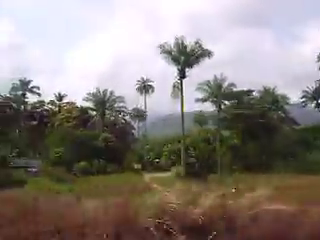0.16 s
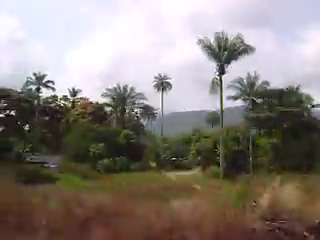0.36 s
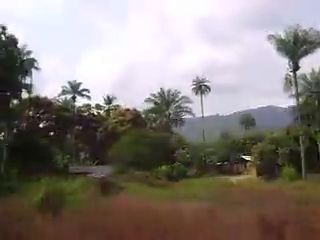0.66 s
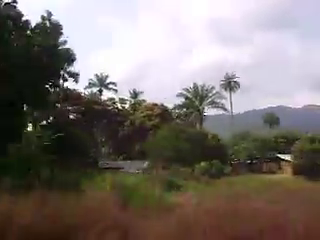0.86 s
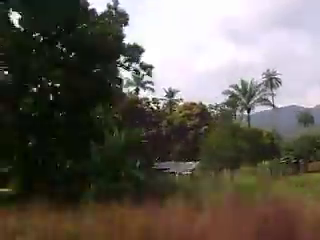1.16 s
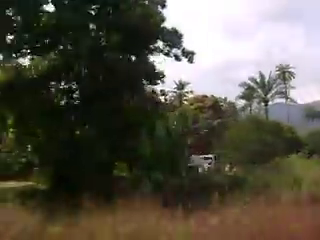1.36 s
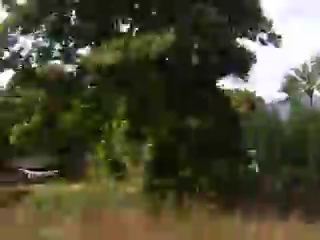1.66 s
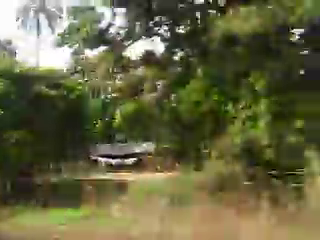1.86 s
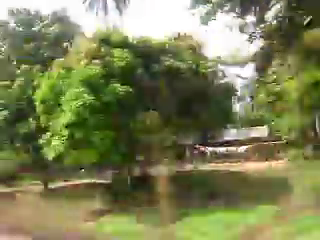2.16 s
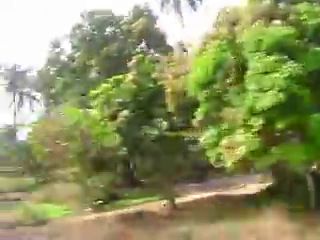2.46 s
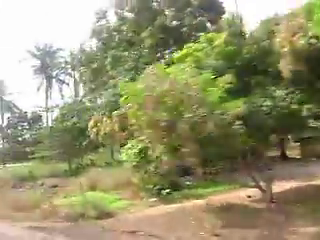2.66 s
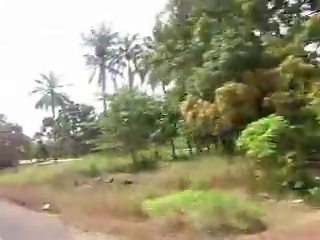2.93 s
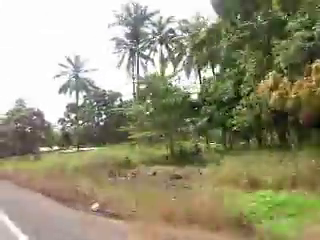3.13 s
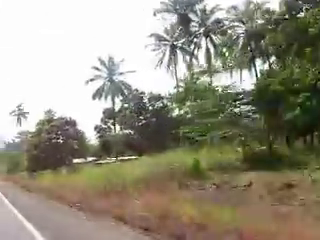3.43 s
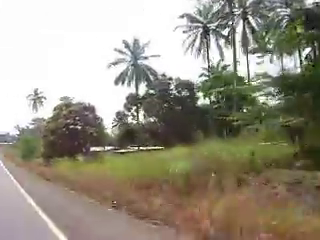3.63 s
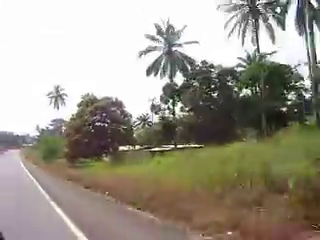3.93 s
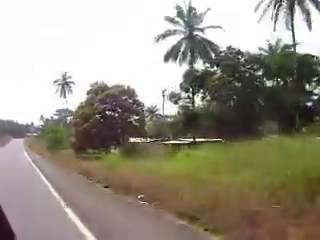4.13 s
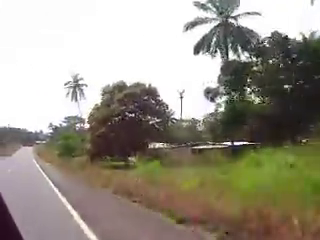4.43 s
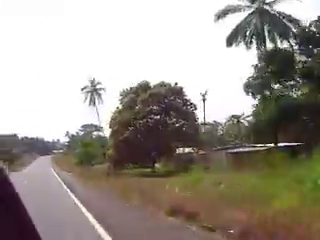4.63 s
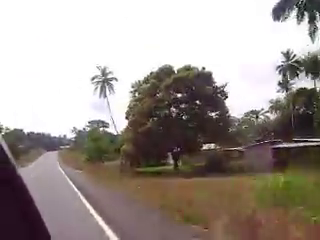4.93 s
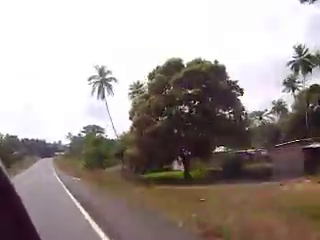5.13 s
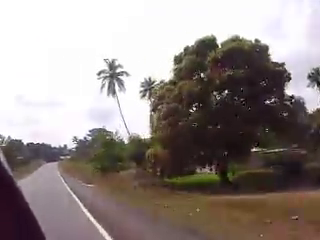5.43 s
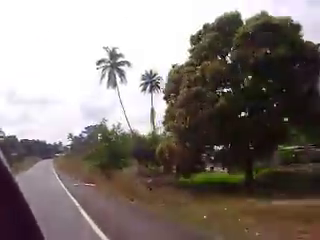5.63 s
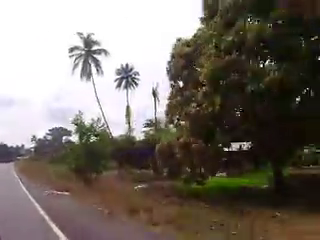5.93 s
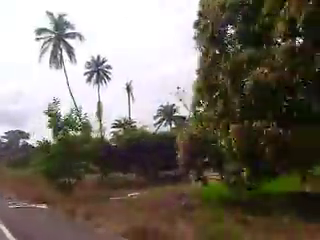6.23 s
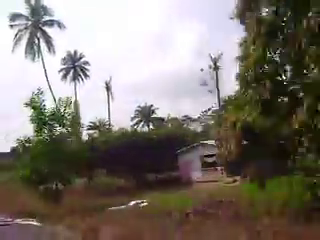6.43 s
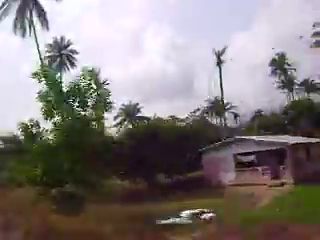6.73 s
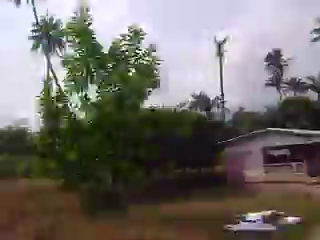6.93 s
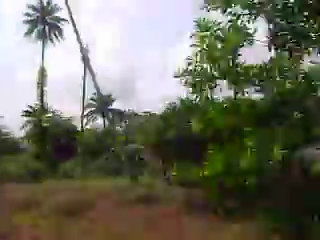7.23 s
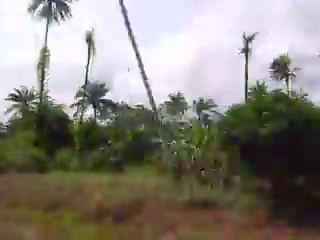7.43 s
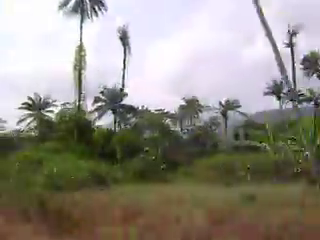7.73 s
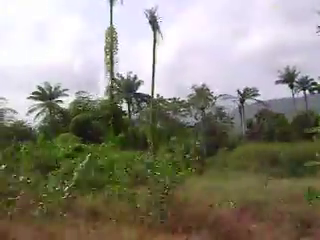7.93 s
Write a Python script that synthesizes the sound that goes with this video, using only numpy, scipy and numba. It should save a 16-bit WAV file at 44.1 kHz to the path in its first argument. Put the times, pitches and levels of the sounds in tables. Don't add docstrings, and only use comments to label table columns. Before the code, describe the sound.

Inside a moving car, steady road noise is overwhelmed by pumping, crackling wind distortion that thins out and drops off sharply.

```python
import sys
import numpy as np
from scipy import signal
from scipy.fft import rfft, irfft
from scipy.io import wavfile
from scipy.ndimage import uniform_filter1d
from numba import njit

SR = 44100
rng = np.random.default_rng(int(sys.argv[2]) if len(sys.argv) > 2 else 0)


def log_audio(samples):
    frames = np.atleast_2d(samples).T
    limited = np.clip(frames, -1, 1)
    pcm = np.round(limited * 32767).astype(np.int16)
    wavfile.write(sys.argv[1], SR, pcm)


def nominal_scale(level):
    x = np.asarray(level, float) / 20
    return 10 ** x


N = 356328
TIME_S = np.arange(N) / SR


def curve(table):
    s, *columns = np.transpose(table)
    return [np.interp(TIME_S, s, column) for column in columns]


def bumps(table):
    s, length_s, *columns = np.transpose(table)
    coarse_s = np.arange(0, N, 32) / SR
    distance = (coarse_s - s[:, None]) / np.maximum(length_s, .01)[:, None]
    bell = np.exp(-(2 * distance) ** 2)
    return [np.interp(TIME_S, coarse_s, column @ bell) for column in columns]


def unit(x):
    return x / np.sqrt(np.mean(x ** 2))


def even(x, seconds):
    return x / np.sqrt(uniform_filter1d(x ** 2, int(seconds * SR)) + 1e-12)


def walk(rate_hz):
    hold = int(SR / rate_hz)
    steps = np.repeat(rng.standard_normal(N // 100), hold)[:N]
    return unit(uniform_filter1d(uniform_filter1d(steps, hold), hold))


def coloured(spectrum):
    hz, db = np.transpose(spectrum)
    f = np.maximum(np.fft.rfftfreq(N, 1 / SR), 1)
    gain = nominal_scale(np.interp(np.log(f), np.log(hz), db))
    gain = gain * np.minimum(f / hz[0], 1) ** 3
    return unit(irfft(rfft(rng.standard_normal(N)) * gain, N))


def split(x, hz):
    low = signal.sosfiltfilt(signal.butter(2, hz, fs=SR, output="sos"), x)
    return low, x - low


@njit
def resonance(x, hz, damping):
    y, band, low = np.empty(len(x)), 0., 0.
    for i in range(len(x)):
        g = np.tan(np.pi * hz[i] / SR)
        v = (band + g * (x[i] - low)) / (1 + g * (g + damping))
        band = 2 * v - band
        low = low + 2 * g * v
        y[i] = damping * v
    return y


# start_s, level_db
ROAD_GAIN = [
    (0, 0),
    (.5, -1.5),
    (1.9, -2),
    (2.4, 1),
    (4, -7.5),
    (6.5, -18),
    (8.08, -20.5),
]
# pitch_hz, level_db (per Hz)
TYRE_TONE = [
    (60, 5),
    (150, -17.5),
    (400, -12),
    (900, -6),
    (1300, -10.5),
    (1900, -13.5),
    (2800, -21),
    (4000, -31.5),
    (5500, -38.5),
]
# pitch_hz, level_db
GEAR_TONES = [
    (366.1, -40),
    (678.3, -39.5),
    (931.3, -37),
]


def road():
    roar_db = -23.5 + 0.15 * walk(8.9) + 1.2 * walk(40)
    sound = coloured(TYRE_TONE) * nominal_scale(roar_db)
    for hz, db in GEAR_TONES:
        level = nominal_scale(db + 4.0 + 0.73 * walk(4.5))
        wavering_hz = hz * (1 + .003 * walk(5))
        sound = sound + level * np.sin(2 * np.pi * np.cumsum(wavering_hz) / SR)
    return sound * nominal_scale(curve(ROAD_GAIN)[0])


# start_s, level_db
BUFFET_LEVEL = [(0, -20), (.4, -20), (.75, -27), (1.1, -32), (1.5, -19.5), (2.0, -20), (2.1, -11),
                (2.7, -7), (3.5, -9), (3.85, -13.5), (4.05, -9), (4.3, -13), (4.55, -10.5), (4.9, -14),
                (5.3, -10.5), (5.9, -16.5), (7.4, -16), (7.55, -23)]
# start_s, pitch_hz
BUFFET_PITCH = [
    (0, 60.3),
    (1.3, 60),
    (1.6, 74.7),
    (2.4, 81),
    (3, 95.96),
    (5.5, 100.8),
    (6.5, 87.2),
    (7.3, 70.43),
    (8.08, 57.9),
]
# middle_s, length_s, level_db
THROB_EVENTS = [(.27, 0.087, -11), (.38, .04, -8), (.79, .05, -7), (.84, .06, 5.5), (.94, 0.046, -8.5),
                (1.0, 0.067, 3.5), (1.58, 0.12, -8), (1.75, .08, 4.5), (1.93, 0.072, -3),
                (2.63, 0.049, -11.5), (2.86, 0.13, -4), (3.17, .07, -16), (3.26, 0.056, -9.5),
                (3.31, .05, 4), (3.37, 0.032, -3.5), (3.6, 0.05, -4.5), (3.9, 0.034, 5.5),
                (3.94, .05, -6.5), (4.34, 0.038, -11), (4.395, .06, 6), (4.54, 0.066, 7),
                (4.97, 0.055, -0.5), (5.22, .06, -3.5), (5.6, .1, -7), (5.69, .08, 4.5), (5.99, .06, -6),
                (6.05, .06, 9.5), (6.12, .06, -3), (6.8, 0.11, 5), (7.84, 0.069, -6.5)]


def buffet():
    level_db = curve(BUFFET_LEVEL)[0] + bumps(THROB_EVENTS)[0] + 1.5 * walk(14)
    hz = curve(BUFFET_PITCH)[0]
    ring = resonance(resonance(rng.standard_normal(N), hz, 0.8), hz, 0.8)
    deep = resonance(resonance(rng.standard_normal(N), .5 * hz, 1.1), .5 * hz, 1.1)
    deep_db = -4 - 0.12 * (hz - 60)
    return (even(ring, .12) + nominal_scale(deep_db) * even(deep, 0.098)) * nominal_scale(level_db - 0.28)


def crackle(rate_hz, spread_db, seconds):
    when, size = rng.random((2, 4000))
    used = int(rate_hz * N / SR)
    hits = np.zeros(N)
    hits[(when[:used] * N).astype(int)] = nominal_scale(-spread_db * np.log(1 - size[:used]))
    return unit(1 + signal.fftconvolve(hits, np.hanning(int(seconds * SR)), "same"))


def without(heard_db, road_db):
    heard_power = nominal_scale(2 * heard_db)
    road_power = nominal_scale(2 * (road_db + curve(ROAD_GAIN)[0]))
    return np.sqrt(np.maximum(heard_power - road_power, 0.042 * heard_power))


# pitch_hz, level_db (per Hz)
EDDY_TONE = [
    (130, 3.5),
    (243, -4.5),
    (594, -16),
    (1130, -26),
    (1870, -29),
    (2410, -32.5),
    (4480, -26),
    (5600, -21),
]
# start_s, level_db (force), fine_db (fine eddies against large ones)
STREAM_FORCE = [(0, -23.5, -15.5), (.5, -26, -16), (1.15, -25, -18), (2.0, -29, -11.5), (2.16, -21, -15.5),
                (2.34, -15, -10.5), (2.55, -11.5, -15), (2.8, -13.5, -17), (3.3, -10.5, -17.5),
                (3.6, -13.5, -21), (4.1, -14, -20), (4.65, -18.5, -18), (5.75, -19.5, -18.5),
                (6.2, -24.5, -21), (6.875, -27.5, -18.5), (6.91, -44.5, -8.5), (7.35, -45, -10.5),
                (8.08, -42.5, -16.5)]
# middle_s, length_s, large_db (large eddies), fine_db (fine eddies)
GUST_EVENTS = [(.19, 0.1, 0, 6.5), (.255, 0.046, 2.5, -4), (.31, 0.077, 0, 4), (.565, 0.03, 3.5, 3),
               (.838, 0.018, 1.5, 4.5), (1.32, 0.057, -9, 1), (1.37, .04, 5.5, 4), (1.43, 0.03, -2.5, 3),
               (1.51, .04, 2.5, 3.5), (1.73, 0.04, 5.5, 3.5), (2.36, .04, -3.5, 4), (2.48, .04, -2, 0),
               (2.53, 0.057, 5, 3.5), (2.81, 0.033, -4.5, -0.5), (2.98, .1, 2.5, 1.5), (3.13, .1, -4, -4.5),
               (3.58, .03, -9, 2.5), (3.94, 0.037, -2, -0.5), (4.03, 0.068, 3.5, -1), (4.21, .1, -10.5, -4),
               (4.36, 0.14, 4.5, 1), (4.575, 0.019, -6.5, -1.5), (4.88, 0.11, -4.5, -0.5),
               (5.85, .04, -2.5, -3.5), (6.43, 0.035, 1, 2), (6.485, 0.024, 0, 2.5), (6.64, 0.024, 14, -7),
               (6.72, 0.12, 2, 4.5), (7.06, 0.038, 18, 6.5), (7.18, 0.23, 16.5, 1)]
# start_s, broken (0 to 1)
BROKEN_FLOW = [
    (0, 0.68),
    (2.0, 0.3),
    (2.4, 0.59),
    (5.6, 0.26),
    (6.0, 0.51),
    (6.85, 0.59),
    (6.95, 0.45),
    (8.08, 0.34),
]


def rush():
    force_db, fine_db = curve(STREAM_FORCE)
    gust_db, gust_fine_db = bumps(GUST_EVENTS)
    fine = without(force_db + fine_db + gust_fine_db + 0.79 * walk(20), -41)
    large = without(force_db + gust_db + 0.75 * walk(15), -25)
    grain = crackle(130, 3.585, 0.0064) * nominal_scale(0.38 * walk(50))
    grain = grain ** curve(BROKEN_FLOW)[0]
    low, rest = split(coloured(EDDY_TONE), 294)
    mid, rest = split(rest, 990)
    high, top = split(rest, 3290)
    out = even(low, 0.038) * large * nominal_scale(-1.16) * even(grain ** 1.1, .08)
    # noise, share of the large eddies' force, level dB, bite of the crackle
    for part, share, db, bite in ((mid, .55, 7.5, 1.3), (high, .15, 6.0, 1.5), (top, 0, .4, 1.9)):
        force = large ** share * fine ** (1 - share)
        out = out + unit(part) * force * nominal_scale(db) * even(grain ** bite, 0.076)
    dips = [(s - .005, 0.0094, -4.5) for s, *_ in SLAP_EVENTS + MORE_SLAPS]
    return out * nominal_scale(bumps(dips)[0])


# start_s, level_db (peak), treble_db (against the peak)
SLAP_EVENTS = [(0.275, -5.5, -31.5), (0.431, -11, -32), (0.562, -4.5, -23), (1.357, -13.5, -12.5),
               (2.171, -8, -9.5), (2.284, 1.5, -24), (2.422, 5, -19.5), (2.46, 14, -17), (2.486, 1.5, -8),
               (2.538, 9.5, -12), (2.726, -17, -15), (2.904, 4.5, -10), (3.193, 1.5, -29.5),
               (3.405, 1.5, -25.5), (3.448, 4, -14.5), (3.658, -2, -17), (4.574, -12.5, -35.5),
               (4.98, -4.5, -17), (5.19, -5.5, -14), (5.419, -12, -17), (5.881, -12, -9),
               (6.022, -17, -19), (6.062, -8, -18), (6.133, -22, -18), (6.161, -17, -23.5),
               (6.223, -13.5, -6), (6.407, -9.5, -10), (6.431, -11, -11), (6.528, -15, -21),
               (7.051, -13, -18)]
# start_s, level_db (peak), treble_db (against the peak)
MORE_SLAPS = [(0.146, -12, -14), (0.189, -21, -16), (0.212, -6.5, -13), (0.834, -12, -26),
              (1.159, -14, -11.5), (1.507, -9, -14), (2.104, -9, -17.5), (2.207, -13, -8), (2.453, 0, -14),
              (2.969, -1.5, -12), (3.23, -9, -11), (3.275, -3, -12), (3.31, -13, -11),
              (4.076, -10.5, -16.5), (4.302, -7, -12), (4.385, 0, -8), (5.962, -14, -13),
              (6.383, -13, -13), (6.464, -18, -8.5), (6.679, -26, -16), (6.768, -20, -14.5),
              (6.811, -22.5, -4), (6.849, -24, -16), (7.065, -19, -16), (7.184, -17.5, -9),
              (7.424, -21.5, -19)]


def slaps():
    low, high = split(coloured(EDDY_TONE[2:]), 1900)
    t = np.arange(1200) / SR
    shape = (t / .0012) ** .6 * np.exp(-t / 0.0032)
    out = np.zeros(N)
    for s, db, treble_db in SLAP_EVENTS + MORE_SLAPS:
        i = int((s - .0006) * SR)
        thud = shape * low[i:i + len(t)]
        hiss = shape * high[i:i + len(t)]
        slap = thud / np.abs(thud).max() + nominal_scale(treble_db + 11.0) * hiss / np.abs(hiss).max()
        out[i:i + len(t)] += nominal_scale(db - 4.0) * slap
    return out


def scene():
    return (road() + buffet() + rush() + slaps())[None]


def band_limit(x):
    return signal.sosfilt(signal.butter(12, 15870, fs=SR, output="sos"), x)


def record(dry):
    input_top, output_top = 0.69, 0.697
    band_hz, sample_hz = 5708, 11025
    x = signal.sosfilt(signal.butter(2, 36, "high", fs=SR, output="sos"), dry)
    x = np.clip(x, -input_top, input_top)
    x = signal.sosfiltfilt(signal.cheby2(7, 45, 1.2355 * band_hz, fs=SR, output="sos"), x)
    x = x * (1 + nominal_scale(-80.5) * np.cos(2 * np.pi * sample_hz * TIME_S))
    x = np.clip(x, -output_top, output_top)
    return band_limit(x)


dry = scene()
out = record(dry)
log_audio(out)
```